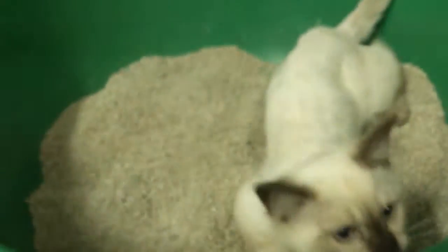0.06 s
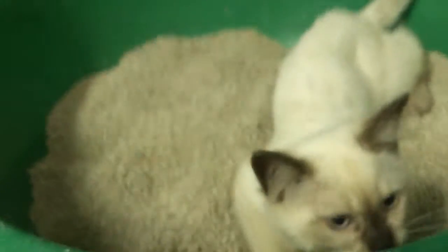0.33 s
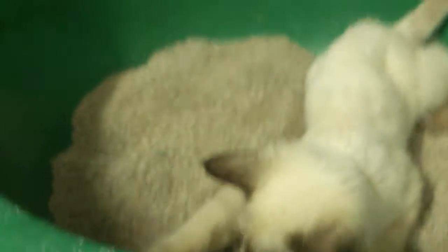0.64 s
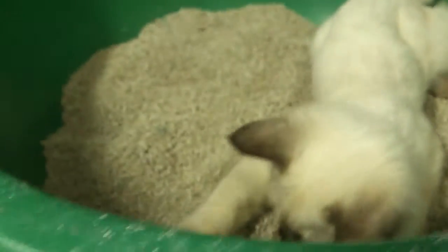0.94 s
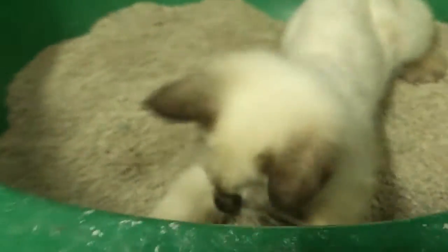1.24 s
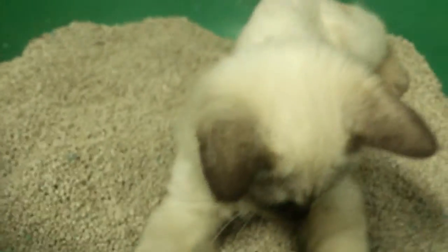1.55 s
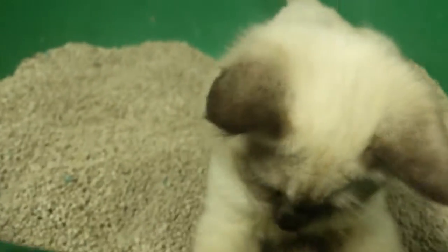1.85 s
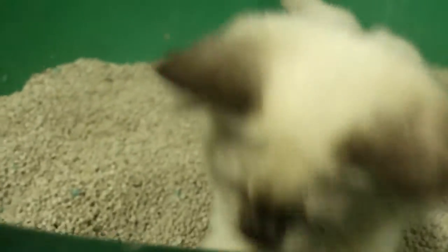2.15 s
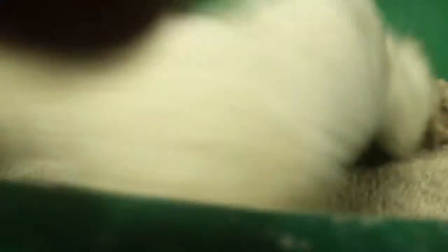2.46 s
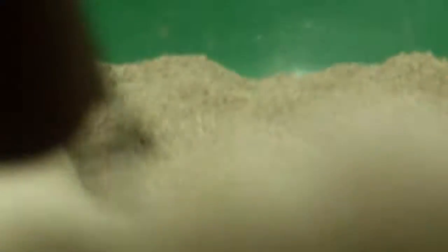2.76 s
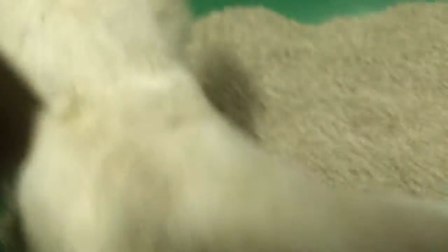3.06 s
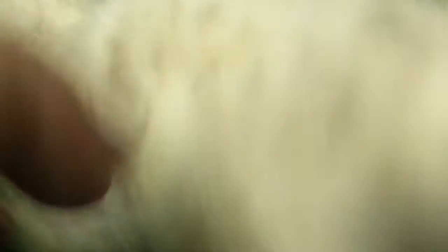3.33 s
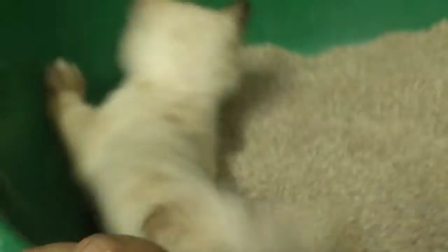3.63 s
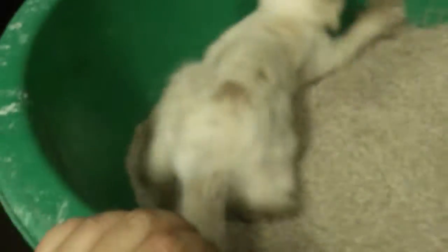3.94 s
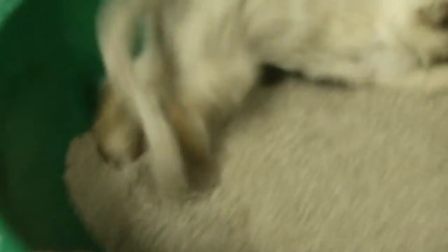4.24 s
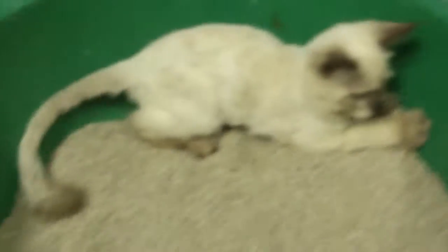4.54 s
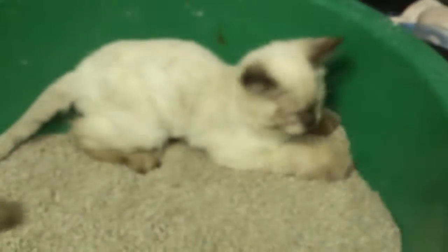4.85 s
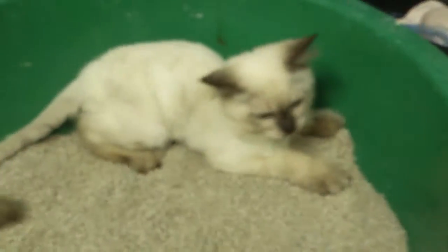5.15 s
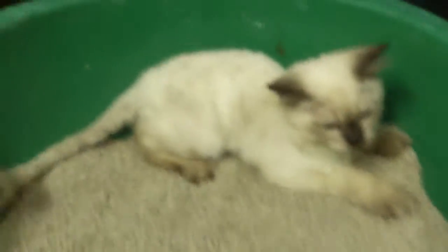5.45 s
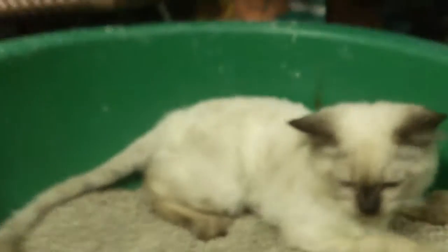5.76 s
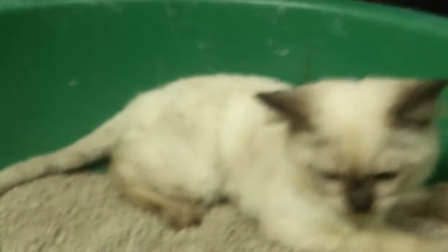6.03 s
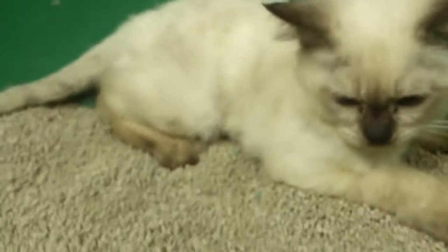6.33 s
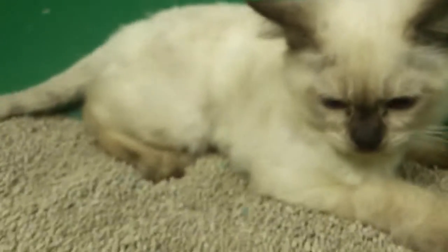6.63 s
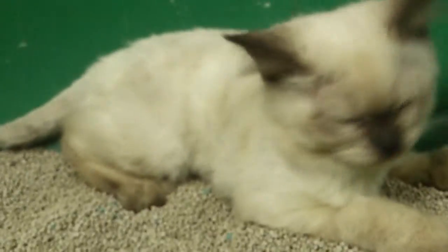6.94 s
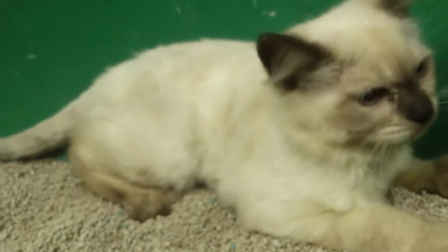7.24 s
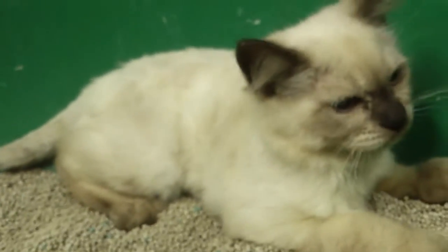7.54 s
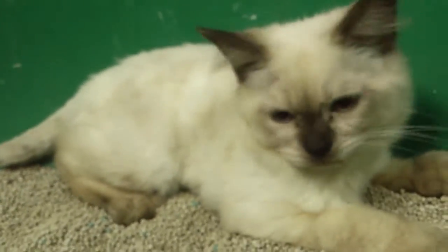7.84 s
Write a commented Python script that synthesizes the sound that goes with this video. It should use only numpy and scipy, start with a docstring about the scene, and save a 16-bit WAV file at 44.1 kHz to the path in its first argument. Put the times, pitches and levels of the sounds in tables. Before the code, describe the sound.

Litter crunches and claws click against a plastic tub as a kitten scuffles, amid close handling thumps and soft room hiss.

```python
"""A small room, close to a hand-held camera: a kitten paws and scrambles in a plastic tub of litter
while a hand moves it. The granules crunch and slide as a multitude of tiny collisions. Claws and grit
tick and rasp on the plastic, and a few knocks excite the damped modes of the tub wall. Fingers on the
camera send dull bumps and rumble through its case, over a steady hiss with faint tones and one chirp."""
import sys
import numpy as np
from scipy import signal
from scipy.fft import rfft, irfft
from scipy.io import wavfile
from scipy.ndimage import uniform_filter1d

SR = 44100
rng = np.random.default_rng(int(sys.argv[2]) if len(sys.argv) > 2 else 0)


def wav_out(sig):
    """Save sig, one row per channel (or a flat mono array), as 16-bit PCM at SR to the path in sys.argv[1]."""
    wavfile.write(sys.argv[1], SR, np.round(np.clip(np.atleast_2d(sig).T, -1, 1) * 32767).astype(np.int16))


N = 356769
TIME = np.arange(N) / SR

# spectrum of crunching litter: (frequency [Hz], relative level [dB])
LITTER_SPECTRUM = [(150, 5), (380, -4), (600, -4), (840, -1), (1350, -4), (3500, 0.5), (6000, -6),
                   (8100, -16.5), (10500, -6), (12500, -22), (15800, -37)]
# paws landing: (time [s], duration [s], level [dB], grit spray relative to the crunch [dB])
PAW_STEPS = [(1.17, 0.03, -49.5, 0.5), (1.221, 0.024, -45, -3.5), (2.107, 0.045, -48, -8),
             (2.156, 0.02, -39, -8), (2.188, 0.045, -47.5, -16), (3.927, 0.035, -28, -10.5),
             (4.385, 0.013, -40, -12)]
# deep paw strokes through the litter, some bright and some dull:
# (time [s], duration [s], level [dB], spectral tilt [dB per two octaves])
PAW_STROKES = [(2.37, 0.25, -44, -9), (2.534, 0.13, -43.5, 13), (2.66, 0.11, -32.5, -6.5),
               (2.796, 0.094, -40.5, 14), (2.988, 0.067, -52.5, 14), (3.122, 0.051, -32, -7),
               (3.144, 0.043, -26, 4.5), (3.246, 0.029, -32.5, 3.5), (3.317, 0.037, -42, 4),
               (3.467, 0.11, -33.5, 2), (3.517, 0.06, -24.5, 2.5), (3.638, 0.048, -26, 3.5),
               (3.738, 0.084, -28.5, -0.5), (4.005, 0.057, -34.5, 1.5), (4.057, 0.052, -34, -4.5),
               (4.204, 0.059, -32, -1)]


def amp(db):
    return 10 ** (np.asarray(db) / 20)


def unit(x):
    return x / np.sqrt(np.mean(x ** 2) + 1e-20)


def add(mix, start_s, sound):
    part = mix[max(round(start_s * SR), 0):][:len(sound)]
    part += sound[:len(part)]


def colour(x, spectrum):
    """Spectral shaping by a gain curve on a log-frequency axis; rms 1."""
    hz, db = np.transpose(spectrum)
    bins = np.fft.rfftfreq(len(x), 1 / SR)
    gain = amp(np.interp(np.log(bins + 1), np.log(hz), db))
    return unit(irfft(rfft(x) * gain, len(x)))


def wander(rate_hz):
    """Low-passed noise gives a slow random modulation; rms 1."""
    bins = np.fft.rfftfreq(N, 1 / SR)
    return unit(irfft(rfft(rng.standard_normal(N)) * np.exp(-(bins / rate_hz) ** 2), N))


def shade(x, tilt, pivot_hz, patchy_db):
    """Time-varying filtering: a spectral tilt [dB per two octaves] plus brief random patches of gain."""
    hz, t, spectra = signal.stft(x, SR, nperseg=256)
    double_octaves = np.log2(np.clip(hz, 1000, 10000) / pivot_hz)[:, None] / 2
    patches = uniform_filter1d(rng.standard_normal(spectra.shape), size=4, axis=0)
    patches = unit(uniform_filter1d(patches, size=12, axis=1))
    gain = amp(double_octaves * np.interp(t, TIME, tilt) + patchy_db * patches)
    return signal.istft(spectra * gain, SR, nperseg=256)[1][:N]


def pushes(rows, rise_s, sag_db_per_s, fade_db_per_s):
    """One envelope per push: a smooth attack, a slow drift while it lasts, then exponential decay."""
    out = np.zeros((len(rows), N))
    for envelope, (start, length, db, *_) in zip(out, rows):
        t = np.arange(0, length + 1, 1 / SR)
        rise = np.sin(np.pi / 2 * np.minimum(t / rise_s, 1)) ** 2
        level_db = db - sag_db_per_s * t - fade_db_per_s * np.maximum(t - length, 0)
        add(envelope, start, rise * amp(level_db))
    return out


def power_sum(envelopes):
    """Incoherent sources add in power."""
    return np.sqrt((envelopes ** 2).sum(0))


def impulses(per_s, spread_db):
    """A Poisson process of tiny impacts: many faint, a few strong."""
    size = amp(spread_db * np.minimum(rng.exponential(1, N), 4.5))
    return unit(size * rng.choice([-1., 1.], N) * (rng.random(N) < per_s / SR))


def squeak(length, first_hz, last_hz, width_hz):
    """Random excitation of one gliding resonance gives narrow-band noise that swells and fades."""
    progress = np.arange(0, length, 1 / SR) / length
    count = len(progress)
    low_pass = 1 / np.sqrt(1 + (2 * np.fft.rfftfreq(count, 1 / SR) / width_hz) ** 6)
    in_phase, quadrature = irfft(rfft(rng.standard_normal((2, count))) * low_pass, count)
    phase = 2 * np.pi * np.cumsum(first_hz + (last_hz - first_hz) * progress) / SR
    resonance = in_phase * np.cos(phase) + quadrature * np.sin(phase)
    return unit(resonance * np.sqrt(abs(np.sin(np.pi * progress))))


def background():
    """The noise floor: broadband hiss under a few faint, slightly wavering spectral lines."""
    # room hiss: (frequency [Hz], relative level [dB])
    hiss_spectrum = [(55, 14.5), (220, 5), (330, 3.5), (560, -3), (850, 3), (1080, -2.5), (2000, -3.5),
                     (3100, -4.5), (3700, -5.5), (7000, -10.5), (8300, -13.5), (10300, -10), (12000, -19),
                     (15800, -25)]
    # the hiss brightens a little as the camera turns: (time [s], tilt [dB per two octaves])
    hiss_tilt = [(0, -4), (4.7, -4.5), (5.6, -3), (8.1, -3)]
    # tones of an appliance and the camera's electronics: (frequency [Hz], rms level [dB])
    steady_tones = [(457.6, -64.5), (866.7, -63.5), (9766, -74)]
    tilt = np.interp(TIME, *np.transpose(hiss_tilt))
    hiss = shade(colour(rng.standard_normal(N), hiss_spectrum), tilt, pivot_hz=2500, patchy_db=1.5)
    out = amp(-47.5) * hiss
    for hz, db in steady_tones:
        phase = 2 * np.pi * np.cumsum(hz + 1.63 * wander(rate_hz=7.05)) / SR
        out += amp(db) * np.sqrt(2) * np.sin(phase)
    return out


def chirp():
    """Noise in a very narrow band is heard as a pitch: a thin chirp just above the hiss."""
    # faint high chirp: (time [s], duration [s], level [dB], frequency [Hz])
    chirps = [(5.362, 0.055, -58.5, 3690)]
    out = np.zeros(N)
    for start, length, db, hz in chirps:
        add(out, start, amp(db) * squeak(length, hz, hz, width_hz=25))
    return out


def handling():
    """Structure-borne sound: slips of the grip thud through the case; bumps swing it a cycle or two."""
    # response of the camera case: (frequency [Hz], relative level [dB])
    case_response = [(30, -75), (55, 8), (100, 7), (160, 0.5), (240, -5.5), (350, -10), (500, -25),
                     (900, -32), (4000, -100)]
    # shifts of the grip: (time [s], duration [s], level [dB])
    grip_shifts = [(.1, 0.087, -42.5), (.31, 0.087, -42), (.79, 0.31, -38.5), (2.08, 0.06, -33.5),
                   (2.13, 0.59, -30), (3.28, 0.052, -35), (3.43, 0.041, -34.5), (3.55, 0.35, -41),
                   (3.8, 0.19, -32.5), (4.07, 0.35, -44.5), (4.67, 0.041, -34), (4.81, 0.12, -34.5),
                   (5, 0.31, -43.5), (5.83, 0.093, -42), (6.83, 0.11, -41), (7.04, 0.21, -40.5),
                   (7.33, 0.37, -37), (7.82, 0.2, -40)]
    # dull bumps through the camera body, plus the low thuds of the tub under the knocks at 2.683 s and 4.224 s:
    # (time [s], level [dB], frequency [Hz])
    bumps = [(0.17, -26.5, 163), (0.953, -23.5, 93), (1.053, -23, 215), (2.352, -18, 232),
             (2.636, -22, 170), (2.677, -14, 177), (2.683, -12.5, 316), (2.734, -21.5, 194),
             (3.325, -27, 180), (3.823, -21, 174), (3.842, -17.5, 113), (3.985, -19, 178),
             (4.224, -26.5, 430), (4.691, -34, 337), (4.696, -20, 128), (4.837, -23, 219),
             (4.853, -20.5, 136), (4.918, -20.5, 125), (5.049, -29.5, 190), (6.41, -30, 121),
             (7.62, -28, 80), (7.089, -25.5, 121), (7.367, -27, 90), (7.41, -20, 84), (7.457, -21.5, 96.5),
             (7.873, -26, 144)]
    resting_grip_db = -50.5
    slips = colour(impulses(per_s=400, spread_db=0.5), case_response)
    # evened out, so that the hand's pressure sets the strength
    slips /= np.sqrt(uniform_filter1d(slips ** 2, size=3500) + 0.016)
    rubs = power_sum(pushes(grip_shifts, rise_s=0.017, sag_db_per_s=-3, fade_db_per_s=214))
    pressure = np.hypot(rubs, amp(resting_grip_db)) * amp(2 * wander(rate_hz=16))
    out = unit(slips) * pressure
    t = np.arange(-2000, 2000) / SR
    for centre, db, hz in bumps:
        swing = np.sin(2 * np.pi * hz * t + rng.uniform(-.5, .5)) * np.exp(-(t * hz / .9) ** 2)
        add(out, centre + t[0], amp(db) * swing)
    return out


def room(x, wet_db, t60_s):
    """Reverberation: dense reflections from the tub and the walls decay exponentially."""
    t = np.arange(SR // 2) / SR
    echoes = rng.choice([-1., 1.], len(t)) * (rng.random(len(t)) < 3000 / SR)
    echoes *= (t > .002) * amp(-60 * t / t60_s)
    echoes = signal.lfilter(*signal.butter(1, 6000, fs=SR), echoes)
    return x + amp(wet_db) * signal.fftconvolve(x, echoes / np.linalg.norm(echoes))[:N]


def claw_scrapes():
    """Stick-slip friction: a claw rasps over the plastic, falling in pitch as it slows."""
    # rasps: (time [s], duration [s], level [dB], first pitch [Hz], last pitch [Hz], bandwidth [Hz])
    rasps = [(0.116, 0.067, -49, 5200, 3500, 700), (0.279, 0.052, -52.5, 5100, 4400, 1500),
             (1.165, 0.045, -42, 1202, 920, 418), (1.168, 0.038, -54, 5060, 4900, 450)]
    out = np.zeros(N)
    for start, length, db, *resonance in rasps:
        add(out, start, amp(db) * squeak(length, *resonance))
    return out


def claw_ticks():
    """A brief contact has a broad spectrum: each tick is a burst, a damped ping and a tail of grit."""
    # claws striking plastic: (time [s], peak level [dB], frequency [Hz], decay time [ms])
    contacts = [(1.198, -28, 5200, 5.8), (1.3976, -26.5, 2310, 3.5), (2.544, -14.5, 10440, 1.1),
                (2.6073, -7, 9560, 1), (2.6294, -17, 9000, 0.56), (2.6738, -15, 6500, 0.89),
                (2.691, -13, 12000, 0.85), (2.7411, -6.5, 7800, 0.2), (3.168, -20, 11600, 1),
                (3.3411, -10.5, 4900, 0.9), (3.368, -22, 9500, .8), (3.447, -28, 4320, 0.7),
                (3.66, -13, 10700, 1.2), (3.764, -24, 2560, 1.1), (3.970, -16, 4980, 4.4),
                (4.2213, -7.5, 6080, 2), (4.4251, -15.5, 3180, 0.81), (4.4498, -21.5, 3820, 0.9),
                (4.581, -30, 4400, 0.88)]
    ping_db, grit_db, grit_decay_s = -2.5, -37, 0.0064
    out, t = np.zeros(N), np.arange(2048) / SR
    soften = signal.butter(8, 13200, fs=SR)
    for start, db, hz, decay_ms in contacts:
        envelope = np.exp(-t * 1000 / decay_ms) + amp(grit_db) * np.exp(-t / grit_decay_s)
        ping = amp(ping_db) * np.sin(2 * np.pi * hz * t)
        burst = (rng.choice([-1., 1.], len(t)) + ping) * envelope
        band = signal.butter(1, [hz * 0.17, min(hz * 1.4, SR * .42)], "bandpass", fs=SR)
        tick = signal.lfilter(*soften, signal.lfilter(*band, burst))
        add(out, start, amp(db) * tick / abs(tick).max())
    return out


def tub_ring(t, centre_hz):
    """Free vibration: the hollow tub rings in the damped modes that the struck spot favours; peak 1."""
    # modes of the tub wall: (frequency [Hz], relative level [dB], time to fall 60 dB [s])
    wall_modes = [(666, 3, 0.045), (852, 7, 0.04), (1040, 3.5, 0.026), (1200, -13, 0.067),
                  (1570, -2, 0.032), (1818, 7, 0.019), (2620, 4, 0.023)]
    ring = 0
    for hz, mode_db, t60 in wall_modes:
        loaded_hz = hz * (1 + 0.025 * rng.standard_normal())
        level_db = mode_db - 60 * t / t60 - 11 * abs(np.log2(hz / centre_hz))
        ring = ring + amp(level_db) * np.sin(2 * np.pi * loaded_hz * t)
    ring *= 1 - np.exp(-t / 0.001)
    return ring / abs(ring).max()


def tub_knocks():
    """Impact excitation: paws and body strike the wall with a clack and a snap, and set it ringing."""
    # knocks: (time [s], level [dB], clack frequency [Hz], swell [cycles],
    # ring relative to the clack [dB], centre of the ring [Hz])
    blows = [(1.167, -30, 1230, 2.8, -1, 1250), (2.5167, -15.5, 1400, 0.8, -5, 1500),
             (2.5208, -15, 1060, 1, -2, 905), (2.626, -17.5, 880, 0.49, -8, 700),
             (2.6796, -7.5, 2070, 0.83, -1, 2100), (2.8504, -7.5, 2070, 1.3, -7, 1080),
             (3.963, -19.5, 1420, 2.5, -6, 1500), (4.219, -10, 3230, 0.59, -12, 520)]
    snap_decay_s = 0.0029
    snap_band = signal.butter(2, [2600, 5000], "bandpass", fs=SR)
    out, t = np.zeros(N), np.arange(9000) / SR
    for start, db, clack_hz, swell_cycles, ring_db, ring_hz in blows:
        cycles = t * clack_hz
        clack = np.sin(2 * np.pi * cycles) * np.exp(-(cycles / swell_cycles - 1.4) ** 2)
        snap = signal.lfilter(*snap_band, rng.standard_normal(len(t)) * np.exp(-t / snap_decay_s))
        snap *= amp(-2) * min(clack_hz / 2200, 1) ** 2  # higher clacks snap harder
        add(out, start, amp(db) * (clack + snap + amp(ring_db) * tub_ring(t, ring_hz)))
    return out


def collisions(per_s, spread_db):
    """Each collision rings briefly at its granule's resonance; per_s is the rate in each of 11 bands."""
    grains = 0
    for hz in np.geomspace(450, 14000, num=11):
        band = signal.butter(1, [hz / np.sqrt(2), hz * np.sqrt(2)], "bandpass", fs=SR)
        grains = grains + signal.lfilter(*band, impulses(per_s, spread_db))
    return unit(grains)


def crunch(per_s, spread_db, slide_db, clump_db):
    """Granular flow: colliding granules give way in clumps over the smooth noise of sliding."""
    flow = collisions(per_s, spread_db) + amp(slide_db) * rng.standard_normal(N)
    return unit(flow * amp(clump_db * wander(rate_hz=63)))


def settling(force):
    """Relaxation: loose granules tick one by one, fading more slowly than the push that freed them."""
    band = signal.butter(5, [1500, 10500], "bandpass", fs=SR, output="sos")
    strays = unit(signal.sosfilt(band, collisions(per_s=14, spread_db=1.8)))
    return amp(-26) * strays * force ** 0.58


def brushing():
    """Small bodies ring high: a light touch moves only the finest grains and makes a thin swish."""
    # sound of the finest grains: (frequency [Hz], relative level [dB])
    fine_spectrum = [(1500, -50), (3000, -15), (4300, -6), (6300, -8.5), (8300, 0.5), (9700, 0.5),
                     (11200, -4), (12300, -5), (13500, -11), (15800, -21)]
    # light touches on top of the litter: (time [s], duration [s], level [dB])
    touches = [(.113, 0.06, -38), (.17, .038, -44.5), (.288, 0.031, -42.5)]
    swish = colour(crunch(per_s=2000, spread_db=3.0, slide_db=-7, clump_db=-0.5), fine_spectrum)
    return swish * power_sum(pushes(touches, rise_s=0.014, sag_db_per_s=37, fade_db_per_s=600))


def stepping(steps):
    """Compaction: a landing paw crunches the litter and sprays crisp grit."""
    # snapping grit: (frequency [Hz], relative level [dB])
    grit_spectrum = [(1000, -7.5), (5500, -2.5), (8300, -8.5), (12200, 0.5), (15800, -26)]
    body = colour(crunch(per_s=900, spread_db=2.0, slide_db=-4.5, clump_db=2.5), LITTER_SPECTRUM)
    spray = colour(collisions(per_s=1000, spread_db=1.5), grit_spectrum)
    spray_gains = amp(np.array(PAW_STEPS)[:, 3:])
    return amp(3.0) * (body * power_sum(steps) + spray * power_sum(steps * spray_gains))


def digging(strokes):
    """Shear: paws push deep and grind the granules; the strongest stroke dominates the timbre."""
    force = power_sum(strokes)
    tilt = np.array(PAW_STROKES)[:, 3] @ strokes ** 2 / (force ** 2 + 1e-20)
    grinding = colour(crunch(per_s=550, spread_db=2.7, slide_db=-9, clump_db=1.4), LITTER_SPECTRUM)
    return shade(grinding, tilt, pivot_hz=3600, patchy_db=2.3) * force


def litter():
    """Amplitude modulation: the force of the paws shapes the noise of the granules and loosened grit."""
    strokes = pushes(PAW_STROKES, rise_s=0.034, sag_db_per_s=15, fade_db_per_s=125)
    steps = pushes(PAW_STEPS, rise_s=0.005, sag_db_per_s=15, fade_db_per_s=240)
    force = np.hypot(power_sum(strokes), power_sum(steps))
    return digging(strokes) + stepping(steps) + brushing() + settling(force)


def scene():
    """Superposition in one channel; only the sounds from the tub reverberate."""
    tub = litter() + claw_scrapes() + claw_ticks() + tub_knocks()
    return (room(tub, wet_db=-16.5, t60_s=0.52) + handling() + background() + chirp())[None]


def record(dry):
    """Band limiting: the microphone rolls off the bass and the recorder cuts the highest treble."""
    bass_cut = signal.butter(4, 38, "highpass", fs=SR, output="sos")
    treble_cut = signal.firwin(511, 16000, window=("kaiser", 9), fs=SR)
    return signal.oaconvolve(signal.sosfiltfilt(bass_cut, dry), treble_cut[None], "same")


dry = scene()
out = record(dry)
wav_out(out)
```